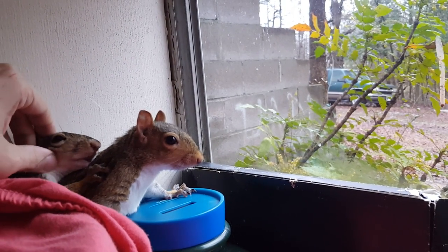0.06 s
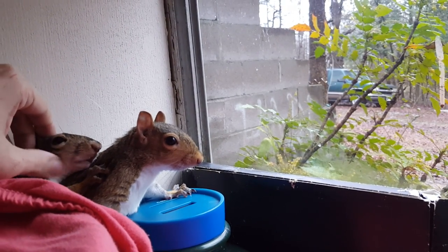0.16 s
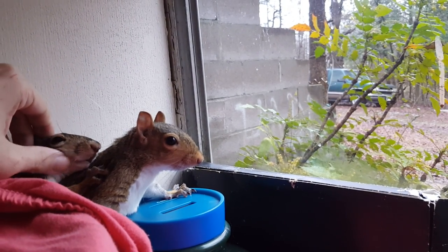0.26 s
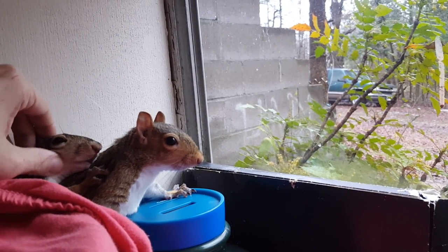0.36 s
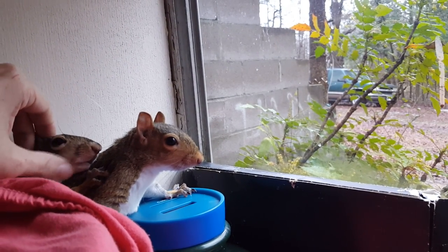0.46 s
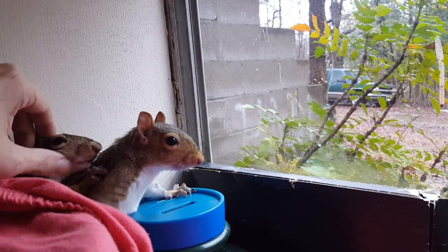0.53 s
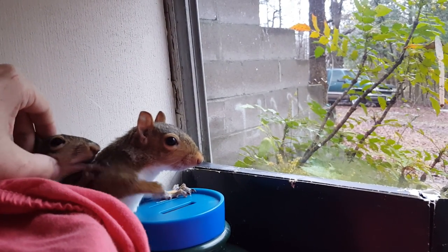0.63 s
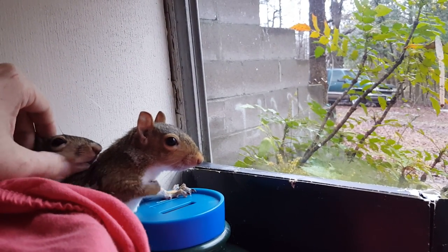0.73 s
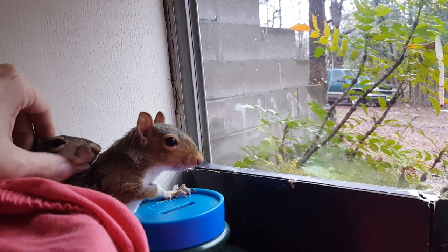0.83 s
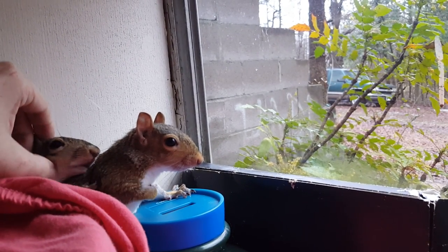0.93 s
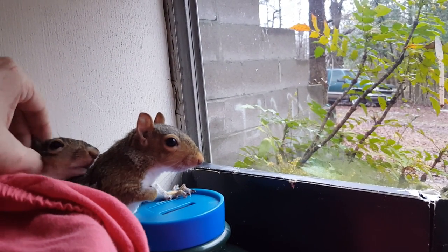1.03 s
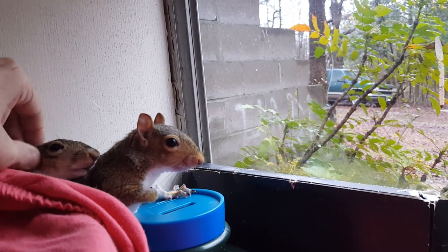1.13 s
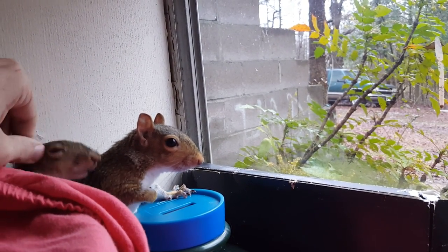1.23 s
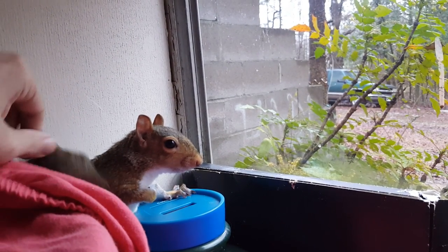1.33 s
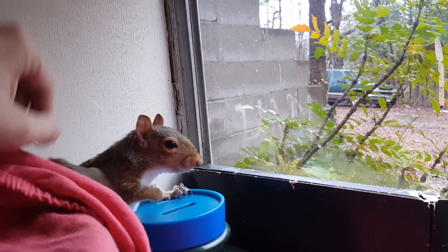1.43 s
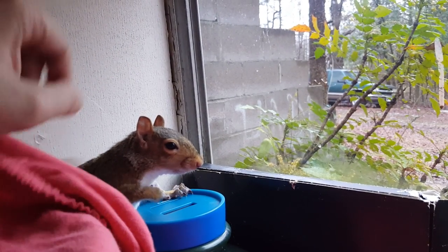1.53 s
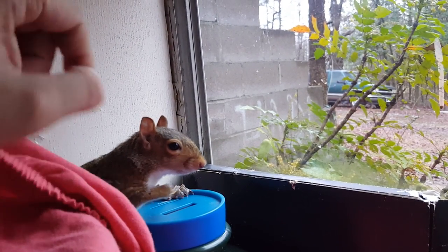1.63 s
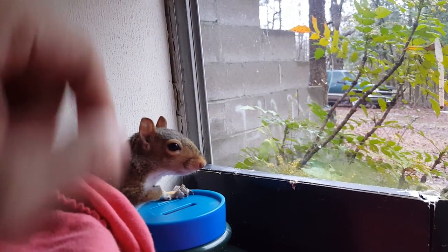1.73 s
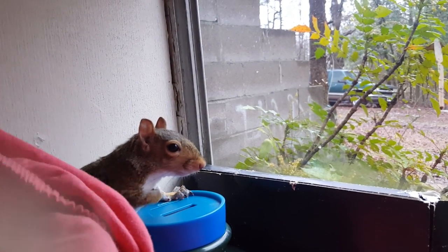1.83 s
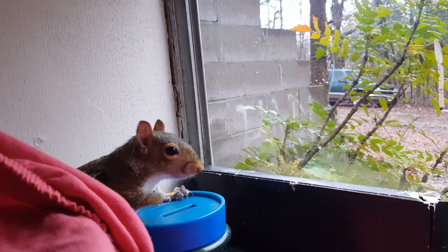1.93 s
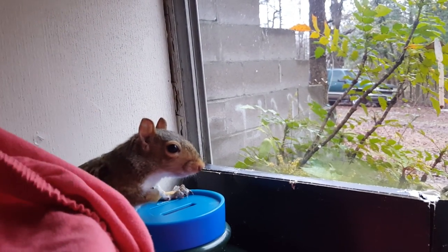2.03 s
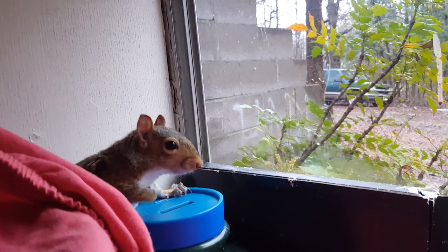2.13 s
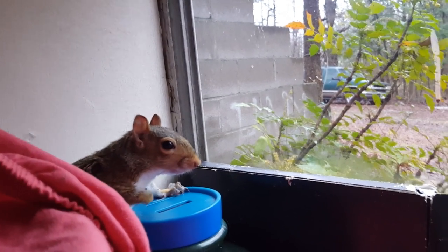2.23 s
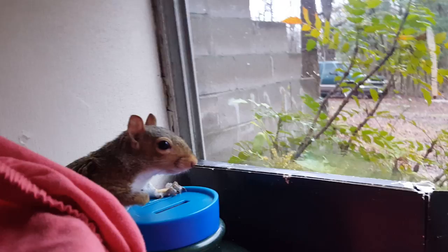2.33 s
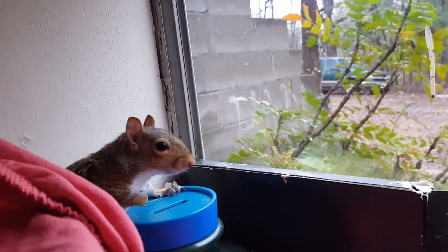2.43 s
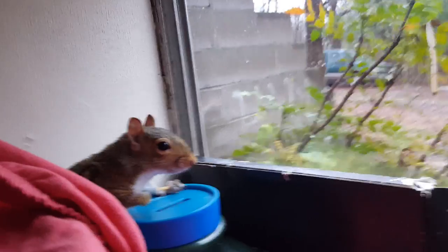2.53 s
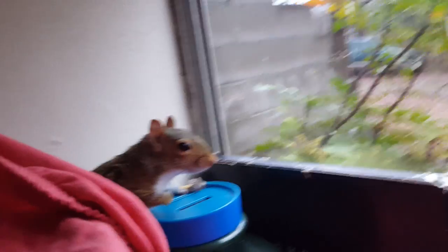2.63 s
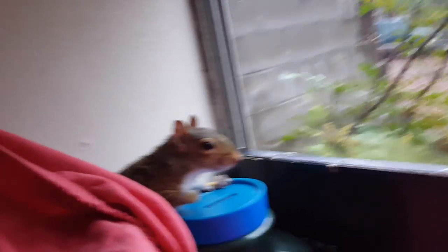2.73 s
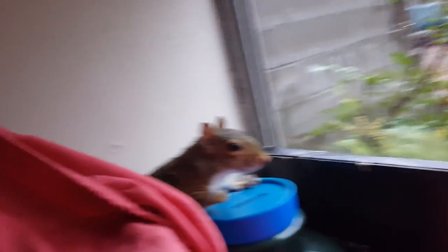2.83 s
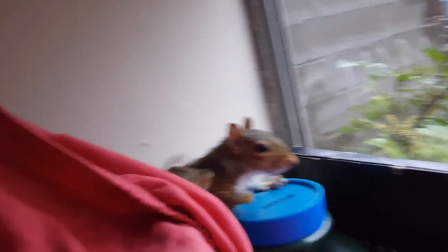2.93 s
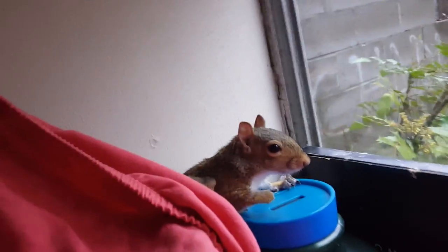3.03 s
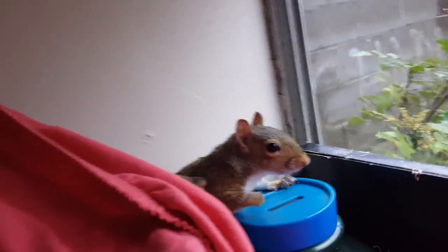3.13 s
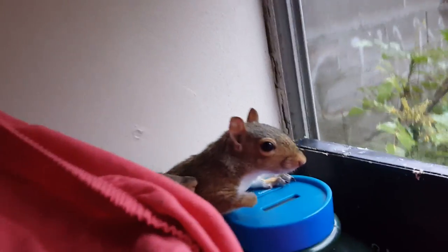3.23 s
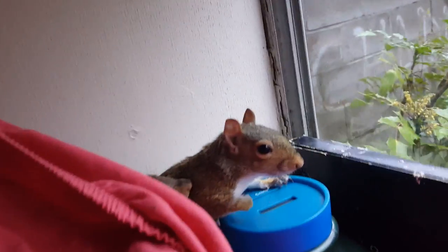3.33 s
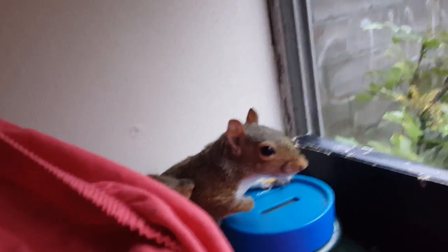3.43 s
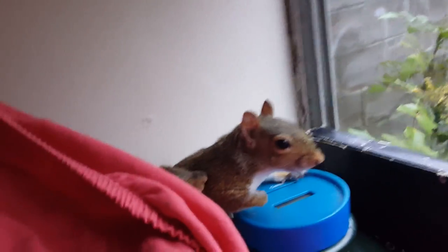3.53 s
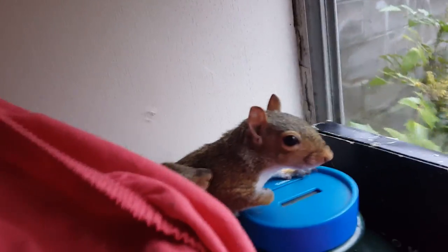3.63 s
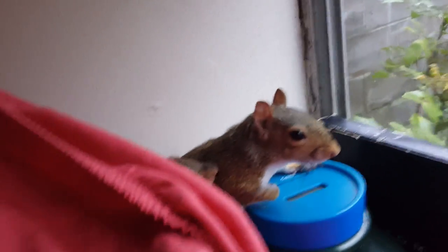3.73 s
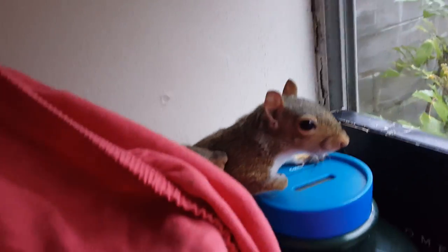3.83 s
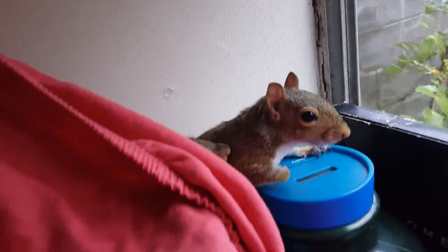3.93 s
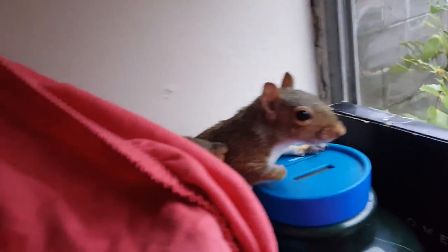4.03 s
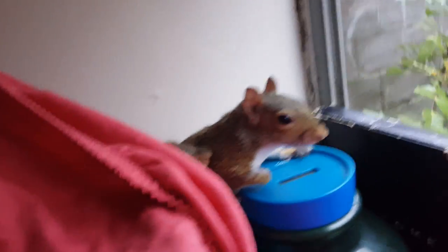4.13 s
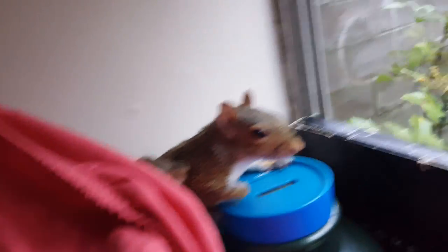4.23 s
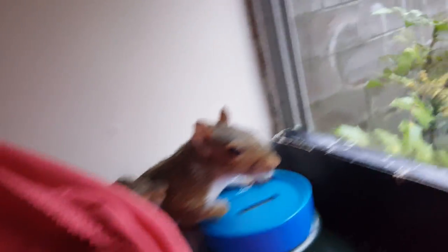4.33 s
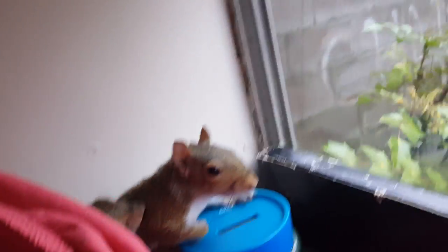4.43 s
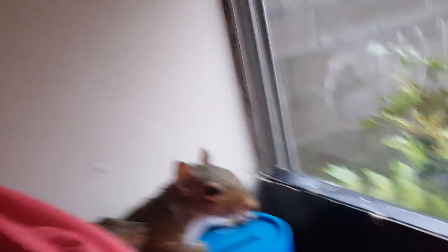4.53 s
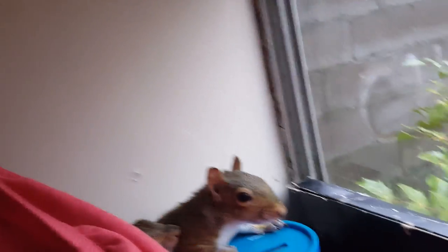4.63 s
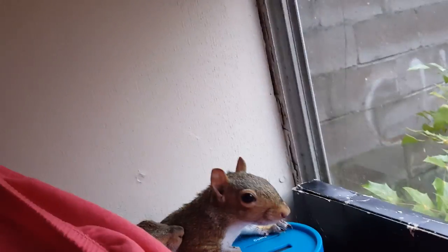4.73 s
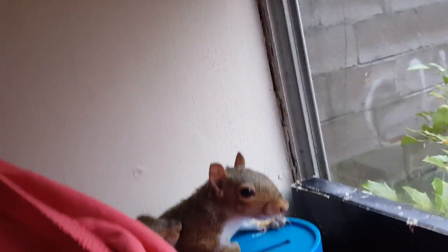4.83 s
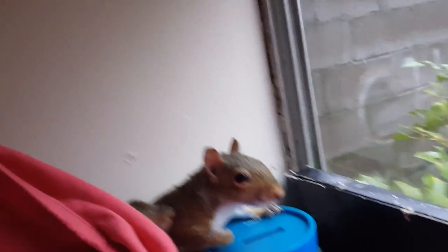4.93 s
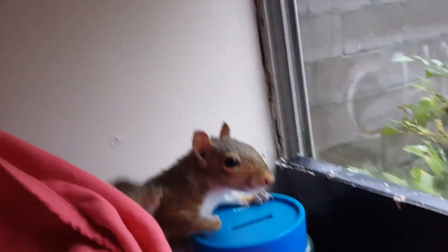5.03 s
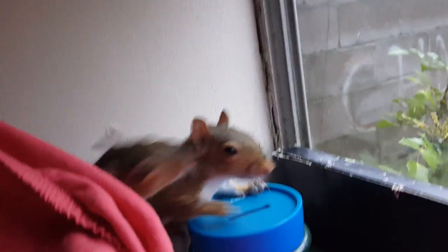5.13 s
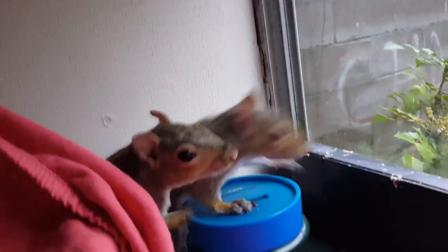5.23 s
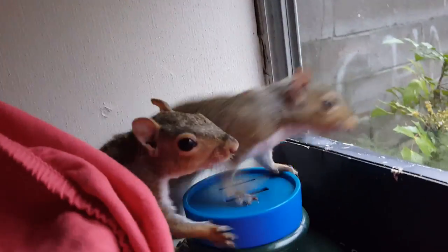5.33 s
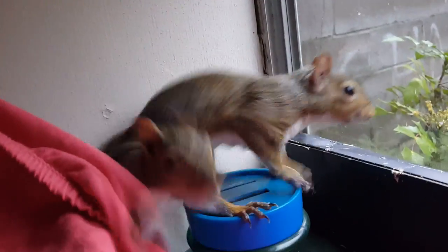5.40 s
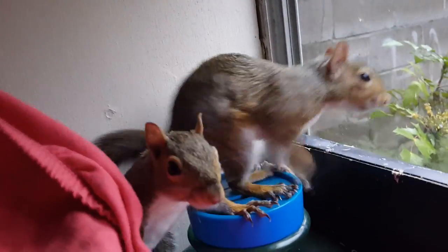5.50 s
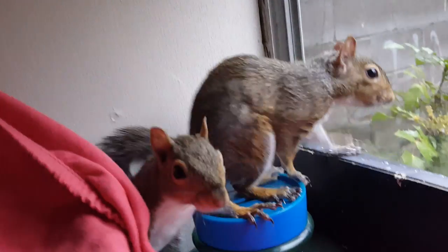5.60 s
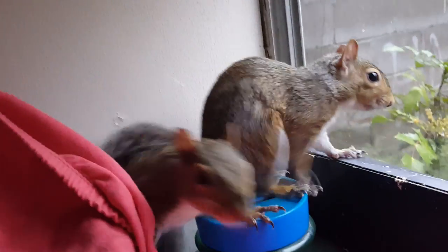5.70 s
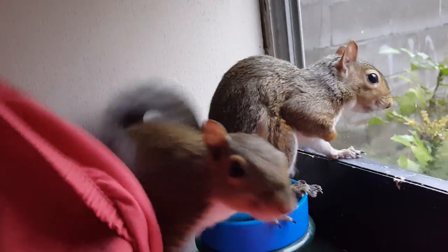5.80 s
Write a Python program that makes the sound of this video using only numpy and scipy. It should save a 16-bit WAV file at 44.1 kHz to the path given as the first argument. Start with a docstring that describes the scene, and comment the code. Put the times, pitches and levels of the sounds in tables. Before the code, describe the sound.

In a small quiet room, a low machine hum with a thin whine runs throughout. After a nearly silent start, sharp claw clicks, soft bumps and cloth rustle come near two seconds, then a tiny low squeak. Another short scuffle follows at three seconds; after a lull, squirrels scramble over a hollow plastic lid with quick clicks and thumps. Close stereo microphone.

```python
"""A machine hums under a quiet room: noise bands and thin tones, shifting as the listener nears the window.
Close by, two young squirrels clamber over a plastic jar lid and onto a windowsill. Claws click (noise bursts),
fur and cloth brush (grainy noise), bodies bump softly and paws knock the lid (decaying sines).
One rub gives a short low squeak (a sagging tone with overtones and fizz). More clicks, scrapes, bumps
and brushes follow as a hand lets them go."""
import sys
import numpy as np
from scipy import signal
from scipy.fft import rfft, irfft
from scipy.io import wavfile
from scipy.ndimage import uniform_filter1d

SR = 44100
rng = np.random.default_rng(int(sys.argv[2]) if len(sys.argv) > 2 else 0)


def generate_wav(sig):
    """Save sig (samples, or channels by samples) to the path in sys.argv[1] as 16-bit PCM at SR."""
    pcm = np.round(np.clip(np.atleast_2d(sig).T, -1, 1) * 32767).astype(np.int16)
    wavfile.write(sys.argv[1], SR, pcm)


N = 258426

# soft bumps of bodies: start_s, level_db, pitch_factor, ring_factor, upper_modes_db
BUMPS = [(1.6, -28, .98, 0.83, 5), (1.93, -27, 1.01, 1.53, 10), (2.886, -26.5, .95, 0.92, -8),
         (3.03, -33, 1.25, 0.4, -6), (5.11, -33.5, 1.04, .47, 7), (5.225, -41, 0.92, 1, 18),
         (5.265, -37, .8, 2.5, 5), (5.339, -34, 1.1, 1.4, 3), (5.379, -28, .8, 2.4, 3),
         (5.479, -22.5, 1.05, 0.91, 10), (5.555, -31.5, 1, .61, 8), (5.787, -26, 1.11, 0.25, 5)]


def amp(db):
    """Decibels to gain."""
    return 10 ** (np.asarray(db) / 20)


def unit(x):
    """Scales to rms 1."""
    return x / np.sqrt(np.mean(x ** 2) + 1e-20)


def read(points, hz):
    """Interpolates a table on a log-frequency axis."""
    point_hz, value = np.transpose(points)
    return np.interp(np.log(hz + 1), np.log(point_hz), value)


def add(mix, start_s, sound):
    """Adds sound to every mix row from start_s, cut at the end."""
    part = mix[:, round(start_s * SR):][:, :sound.shape[1]]
    part += sound[:, :part.shape[1]]


def smooth_noise(n, size):
    """White noise averaged over size samples, rms 1."""
    return unit(uniform_filter1d(rng.standard_normal(n), size=size))


def noise(n, colour):
    """Stereo noise of rms 1 with gain colour(hz); the two sides share mostly the bass."""
    # likeness of the two sides: freq_hz, correlation (0-1)
    alike_points = [(60, 0.97), (150, 0.98), (300, 0.51), (640, 0.46), (1400, 0), (3000, 0), (15000, 0)]
    # left minus right: freq_hz, difference_db
    tilt_points = [(60, -0.5), (200, -0.5), (400, 0.5), (700, 2.5), (1300, 2.5), (2400, 3.5), (4400, -2),
                   (8100, 3.5), (15000, -2.5)]
    hz = np.fft.rfftfreq(n, 1 / SR)
    a, b = rfft(rng.standard_normal((2, n)))
    alike = np.clip(read(alike_points, hz), -1, 1)
    mid = a * np.sqrt(1 + alike)
    side = b * np.sqrt(1 - alike)
    lean = amp(read(tilt_points, hz) / 2)
    spectrum = np.array([(mid + side) * lean, (mid - side) / lean])
    return unit(irfft(spectrum * colour(hz), n))


def band(table, lo_hz, hi_hz):
    """One band of a coloured noise, as long as the scene."""
    def colour(hz):
        """Table gain between steep band edges."""
        low_edge = 1 + (lo_hz / (hz + 1)) ** 10
        high_edge = 1 + (hz / hi_hz) ** 10
        return amp(read(table, hz)) / np.sqrt(low_edge * high_edge)
    return noise(N, colour)


def narrow(centre_hz, width_hz):
    """A wavering tone: noise within a narrow resonance, 12 dB down at the edges of width_hz."""
    return noise(N, lambda hz: 1 / (1 + ((hz - centre_hz) / (width_hz / 2)) ** 2) ** 2)


def background(air_db=-51.69, waver_db=1.0, drift_hz=2.61):
    """Room noise, faint whirs and a machine's hum, whose tones change from place to place."""
    # room noise colour: freq_hz, relative_db_per_hz
    air_points = [(25, -23), (45, -25.5), (70, -10.5), (140, -4), (220, -14.5), (330, -19), (560, -15),
                  (900, -19.5), (1200, -18), (2400, -26), (5200, -42.5), (8400, -44.5), (9600, -50),
                  (16000, -46)]
    # broad, wavering hum bands: centre_hz, width_hz, first_place_db, near_window_db
    hum_bands = [(72, 5.2, -68.5, -90), (117.5, 4.5, -67, -57), (140, 31, -63, -58),
                 (244.3, 8, -79.5, -68.5), (486.4, 47, -68.5, -59), (892, 41, -82, -67.5),
                 (1179, 26, -82, -71)]
    # clean whine of the machine: centre_hz, first_place_db, near_window_db
    whine_tones = [(743, -66, -63.5), (1490, -72.5, -72)]
    # faint whirs: start_s, end_s, centre_hz, width_hz, level_db
    whir_bands = [(0.21, 0.69, 1310, 300, -55), (2.77, 2.96, 1290, 170, -54), (4.9, 8.4, 1200, 160, -61),
                  (3, 4.9, 4200, 1200, -77)]
    # the listener shifts toward the window: start_s, end_s
    move_s = (2, 3.8)
    t = np.arange(N) / SR
    waver = amp(waver_db * smooth_noise(N, 4000))
    out = amp(air_db) * waver * noise(N, lambda hz: amp(read(air_points, hz)))
    for hz, width_hz, first_db, near_db in hum_bands:
        out += amp(np.interp(t, move_s, [first_db, near_db])) * narrow(hz, width_hz)
    drift = drift_hz * smooth_noise(N, 3000)  # Hz, rms drift_hz
    for hz, first_db, near_db in whine_tones:
        tone = unit(np.sin(2 * np.pi * np.cumsum(hz + drift) / SR))
        out += amp(np.interp(t, move_s, [first_db, near_db])) * tone
    for start_s, end_s, hz, width_hz, db in whir_bands:
        progress = np.clip((t - start_s) / (end_s - start_s), 0, 1)
        swell = np.sqrt(abs(np.sin(np.pi * progress)))
        out += amp(db) * swell * narrow(hz, width_hz)
    return out


def claws(mid_db=-7.5, body_db=-1.0, bite_db=-5.0, edge_db=-1.0, hold_s=0.002, catch_db=0.5,
          tail_db=-30, tail_t60_s=0.18):
    """A claw catches and skids: a sharp start, a few ms of tiny slips, a quick decay."""
    # clicks: start_s, level_db, grip_db (how strongly the surface wakes), tip_db (glassy top of the tip)
    clicks = [(.2753, -62, 8, -18), (1.318, -30, -9, -16), (1.95, -18, -14.5, -5), (2.0195, -35, -24, -18),
              (2.372, -54.5, -6, -18), (2.9887, -25, -15, -12), (3.0225, -28.5, -12, -12),
              (3.0605, -35, -1, -14), (3.3074, -53, -18, -10), (5.1344, -46.5, -3, -11),
              (5.2241, -36.5, 12, -13), (5.2895, -27.5, -1, -9), (5.3108, -24, -15, -8),
              (5.3645, -18, -15.5, -13), (5.405, -29.5, -15, -13), (5.4262, -35.5, -5, -13),
              (5.442, -25, -6, -9.5), (5.472, -27, -8, -5), (5.6823, -48, 4, -11), (5.772, -42, 3, -3)]
    # bands of a click, in order main, body, bite, edge: low_hz, high_hz
    click_bands = [(4400, 9500), (500, 2000), (2000, 4400), (9500, 16500)]
    # colour of hard scratching: freq_hz, level_db
    scratch_points = [(400, -1.5), (1300, 7), (2300, 7.5), (3200, 2), (4000, 3.5), (4600, -1.5),
                      (5550, 2.5), (6400, -1), (7300, -2.5), (8100, 2.5), (9500, -6.5), (11500, -7.5),
                      (13500, -4.5), (16000, -6)]
    # lighter taps fall at random while the squirrels find their footing: start_s, end_s
    scramble_s = (5.48, 5.86)
    tap_count, tap_db, tap_spread_db, tap_grip_db, tap_tip_db = 5, -54, 4, 6, -14
    click_t60_s = .03
    t = np.arange(SR // 8) / SR
    taps = []
    for when, force in rng.random(size=(tap_count, 2)):
        tap_s = np.interp(when, [0, 1], scramble_s)
        taps.append((tap_s, tap_db + tap_spread_db * (2 * force - 1), tap_grip_db, tap_tip_db))
    drive = np.zeros((len(click_bands), N))
    for start_s, db, grip_db, tip_db in taps + list(clicks):
        slips = unit(amp(catch_db * smooth_noise(len(t), 16)))
        skid = amp(-60 * np.maximum(t - hold_s, 0) / click_t60_s) * slips
        tail = amp(tail_db - 60 * t / tail_t60_s)
        band_db = np.array([[mid_db], [grip_db + body_db], [grip_db + bite_db], [tip_db + edge_db]])
        add(drive, start_s, amp(db + band_db) * (skid + tail))
    return sum(level * band(scratch_points, *edges) for level, edges in zip(drive, click_bands))


def room(x, t60_s=0.24, wet_db=-17, dull_hz=2500):
    """A small furnished room: a short, dull tail of decaying noise."""
    t = np.arange(SR // 3) / SR
    tail = rng.standard_normal((2, len(t))) * amp(-60 * t / t60_s) * (t > .004)
    tail /= np.linalg.norm(tail[0])
    tail = signal.lfilter(*signal.butter(1, dull_hz, fs=SR), tail)
    return amp(wet_db) * signal.fftconvolve(x, tail, axes=1)[:, :N]


def scuffs(grain_db=2.5, clump_db=2.5, hiss_trim_db=-2.5, snag_rate_hz=70, snag_size=1.1, snag_s=0.0042):
    """Sliding contact: hiss and a duller body swell and fade, broken into grains; at times a fibre snags."""
    # claws skidding: start_s, end_s, level_db
    skid_strokes = [(1.975, 2.041, -49.5), (2.979, 3.031, -39.5), (5.36, 5.461, -41.5), (5.573, 5.591, -44)]
    # fur and cloth brushing: start_s, end_s, level_db
    brush_strokes = [(1.365, 1.49, -57), (1.528, 1.6, -59), (1.915, 2.0, -44), (2.164, 2.29, -57.5),
                     (3.036, 3.17, -55), (3.21, 3.808, -66), (5.141, 5.232, -50), (5.205, 5.275, -40),
                     (5.28, 5.346, -49), (5.744, 5.79, -47.5), (5.824, 5.885, -47.5)]
    # colour of soft brushing: freq_hz, level_db
    brush_points = [(120, 0), (300, 16.5), (800, 10.5), (1400, 4), (2500, 0.5), (3400, -1), (5600, 0),
                    (8300, -0.5), (10000, -8.5), (16000, -3)]
    # relative to the stroke; all hiss is then trimmed by hiss_trim_db
    skid_body_db, brush_hiss_db = -7, -3.5
    # each bump drags fur and cloth along, from just before it lands; levels relative to the bump
    drag_lead_s, drag_s, drag_hiss_db, drag_body_db = 0.013, .055, -27.5, -18.5
    swell_s, swell_share = .018, .1  # fade time: fixed part plus a share of the stroke length

    strokes = [(start_s, end_s, db, db + skid_body_db) for start_s, end_s, db in skid_strokes]
    strokes += [(start_s, end_s, db + brush_hiss_db, db) for start_s, end_s, db in brush_strokes]
    for bump_s, db, *_ in BUMPS:
        start_s = bump_s - drag_lead_s
        strokes.append((start_s, start_s + drag_s, db + drag_hiss_db, db + drag_body_db))

    t = np.arange(N) / SR
    drive = np.zeros((2, N))  # hiss, body
    for start_s, end_s, high_db, low_db in strokes:
        fade_s = swell_s + swell_share * (end_s - start_s)
        swell = (1 + np.tanh((t - start_s) / (fade_s / 2) - 1)) / 2
        fade = (1 + np.tanh((end_s - t) / fade_s - .5)) / 2
        drive += amp([[high_db + hiss_trim_db], [low_db]]) * swell * fade

    grains = unit(amp(grain_db * smooth_noise(N, 50) + clump_db * smooth_noise(N, 500)))
    snag_starts = 1. * (rng.random(N) < snag_rate_hz / SR)
    snags = signal.lfilter([snag_size], [1, -np.exp(-1 / (snag_s * SR))], snag_starts)
    hiss = band(brush_points, 3000, 16500)
    body = band(brush_points, 200, 3000)
    return unit(grains + snags) * drive[0] * hiss + grains * drive[1] * body


def thumps(lowest_hz=65):
    """Weight settles on the jar and its support, which boom briefly; the deepest bass does not radiate."""
    # ring of the jar and its support: mode_hz, level_db, t60_s (before the bump's pitch and ring factors)
    support_modes = [(106.6, -5.5, 0.15), (160.5, -1.5, 0.17), (254, -15, 0.074), (352, -24.5, 0.031)]
    # rise time of a bump of settle_at_db; it doubles with every settle_doubles_db more
    settle_s, settle_at_db, settle_doubles_db = .0105, -26.5, 8.5
    out = np.zeros((2, N))
    t = np.arange(SR // 3) / SR
    for start_s, db, pitch, ring, upper_db in BUMPS:
        rise_s = settle_s * 2 ** ((db - settle_at_db) / settle_doubles_db)
        push = np.sin(np.pi / 2 * np.minimum(t / rise_s, 1))
        for k, (hz, mode_db, t60_s) in enumerate(support_modes):
            decay_db = -60 * np.maximum(t - rise_s, 0) / (t60_s * ring)
            level = amp(db + mode_db + upper_db * (k > 1) + decay_db)
            wave = np.sin(2 * np.pi * hz * pitch * t + k * np.pi)
            add(out, start_s, np.tile(level * push * wave, (2, 1)))
    highpass = signal.butter(2, lowest_hz, "highpass", fs=SR, output="sos")
    return signal.sosfilt(highpass, out)


def knocks(rise_s=0.0011, spread_hz=1100, spread_rad=1.0, left_minus_right_db=1.0):
    """A paw strikes the lid; a soft pad wakes only its low modes, a hard claw all of them."""
    # strikes: start_s, level_db, hardness_hz, pitch_factor
    strikes = [(1.6018, -36, 1200, 1.1), (1.9385, -26, 800, 1.3), (1.9529, -29, 900, 0.84),
               (1.968, -31, 650, 1.3), (3.032, -25, 1250, 1.12), (5.2237, -20, 3420, 1.005),
               (5.2906, -36, 3000, .895), (5.3806, -24, 1080, .85), (5.476, -20, 700, 0.91),
               (5.6835, -15, 510, 1.14)]
    # ring of the lid: mode_hz, level_db, t60_s (before pitch factor and pad damping)
    lid_modes = [(328, -6, 0.039), (485, -1, 0.03), (580, -41, 0.018), (800, -23, 0.064), (933, -1, 0.027),
                 (1220, -8.5, 0.061), (1350, -6.5, 0.06), (1597, -1.5, 0.03), (1864, 4.5, 0.022),
                 (2250, 7, 0.024), (2590, 1, 0.025), (3170, 4, 0.015), (3400, -3.5, 0.038)]
    pad_damping_hz = 130  # softer paws damp the lid more: ring time is halved at this hardness
    out = np.zeros((2, N))
    t = np.arange(SR // 6) / SR
    onset = 1 - np.exp(-(t / rise_s) ** 2)
    chances = rng.random((len(strikes), len(lid_modes)))
    for (start_s, db, hard_hz, pitch), chance in zip(strikes, chances):
        ring = hard_hz / (hard_hz + pad_damping_hz)
        for k, (hz, mode_db, t60_s) in enumerate(lid_modes):
            contact = 1 / np.sqrt(1 + (hz / hard_hz) ** 6)
            # short waves reach the two sides out of step
            lead_rad = (1 + chance[k]) / 2 * min(hz / spread_hz, 1) * spread_rad
            phase_rad = k * np.pi + np.array([[lead_rad], [-lead_rad]])
            wave = np.sin(2 * np.pi * hz * pitch * t + phase_rad)
            level = amp(db + mode_db - 60 * t / (t60_s * ring))
            add(out, start_s, level * contact * wave * onset)
    return out * amp(np.array([[left_minus_right_db], [-left_minus_right_db]]) / 2)


def echoes(x, dull_hz=1800):
    """The window corner throws each knock back a few times, duller."""
    # early echoes from the pane and the wall: delay_left_s, delay_right_s, level_db
    reflections = [(.0043, 0.00558, -16), (0.0118, .0101, -26), (0.018, .0185, -21), (.0247, .0231, -22)]
    dull = signal.lfilter(*signal.butter(2, dull_hz, fs=SR), x)
    out = np.zeros((2, N))
    for left_s, right_s, db in reflections:
        add(out, left_s, amp(db) * dull * [[1], [0]])
        add(out, right_s, amp(db) * dull * [[0], [1]])
    return out


def squeak(third_db=-12, fizz_db=-23, lag_s=0.0068):
    """A rub sticks and slips regularly for a few cycles; each slip fizzes, and it grows buzzier as it lets go."""
    # colour of the slips: freq_hz, level_db
    fizz_points = [(3000, -12), (5500, -1.5), (8500, 1.5), (10300, -4), (11600, 4), (13000, -16),
                   (16000, -27)]
    start_s, level_db = 2.193, -28.5
    attack_s, hold_s, release_s = .009, .019, 0.014
    from_hz, to_hz, sag_s = 360, 263, 0.0089  # pitch sags as the rub slows
    overtone_db, overtone_db_per_s = -23, 450
    corners_s = np.cumsum([0, attack_s, hold_s, release_s])
    t = np.arange(0, corners_s[-1], 1 / SR)
    level = amp(level_db) * np.sin(np.pi / 2 * np.interp(t, corners_s, [0, 1, 1, 0])) ** 2
    hz = to_hz + (from_hz - to_hz) * np.exp(-t / sag_s)
    phase_rad = 2 * np.pi * np.cumsum(hz) / SR
    overtones = np.sin(2 * phase_rad) + amp(third_db) * np.sin(3 * phase_rad)
    wave = np.sin(phase_rad) + amp(overtone_db + overtone_db_per_s * t) * overtones
    fizz = noise(len(t), lambda f: amp(read(fizz_points, f))) * (1 + np.cos(phase_rad) / 2)
    out = np.zeros((2, N))
    add(out, start_s, np.tile(level * wave, (2, 1)))
    add(out, start_s + lag_s, amp(fizz_db) * level * fizz)
    return out


def scene():
    """Sums the contacts, the room's tail on the hard ones, and the background."""
    lid = knocks()
    hard = claws() + lid + echoes(lid) + scuffs()
    return hard + room(hard) + thumps() + squeak() + background()


def record(dry, edge_hz=16100):
    """Band limit: a steep linear-phase low-pass at edge_hz."""
    lowpass = signal.firwin(401, edge_hz, window=("kaiser", 9), fs=SR)
    return signal.oaconvolve(dry, lowpass[None], "same")


dry = scene()
out = record(dry)
generate_wav(out)
```